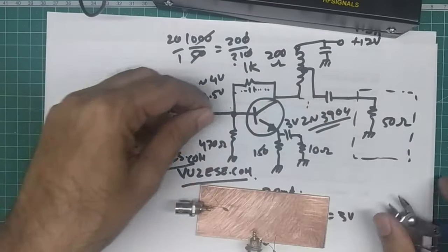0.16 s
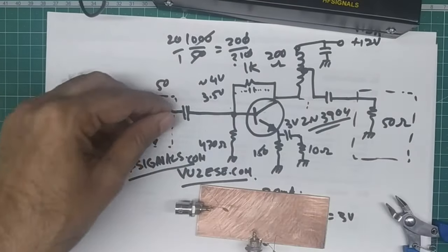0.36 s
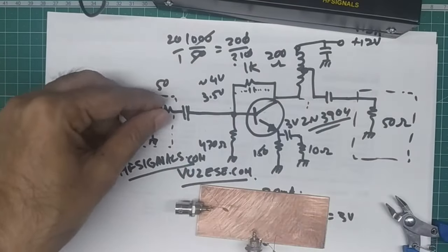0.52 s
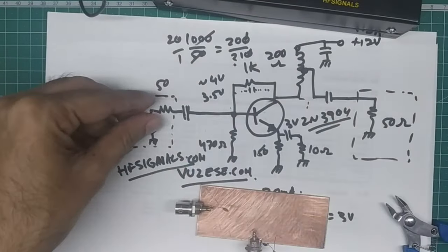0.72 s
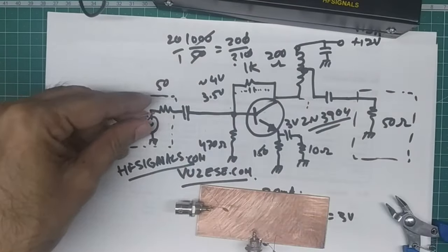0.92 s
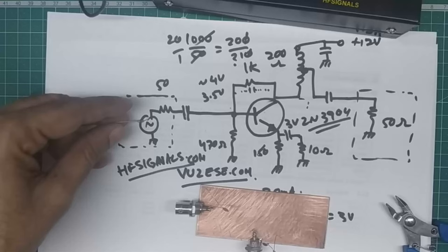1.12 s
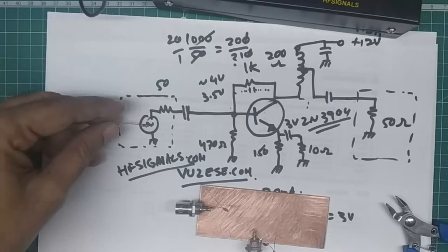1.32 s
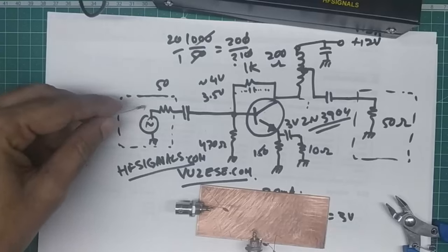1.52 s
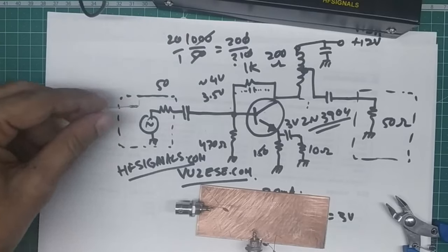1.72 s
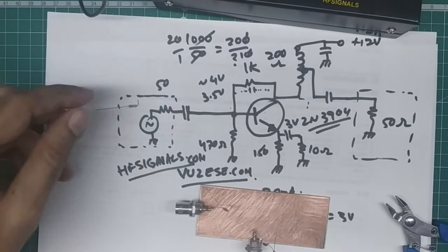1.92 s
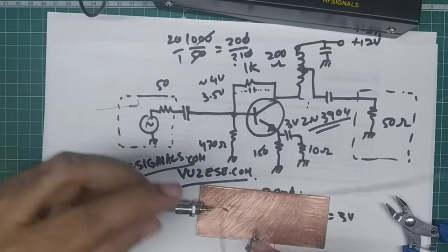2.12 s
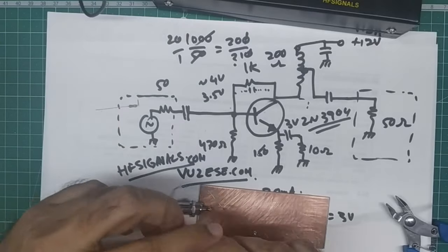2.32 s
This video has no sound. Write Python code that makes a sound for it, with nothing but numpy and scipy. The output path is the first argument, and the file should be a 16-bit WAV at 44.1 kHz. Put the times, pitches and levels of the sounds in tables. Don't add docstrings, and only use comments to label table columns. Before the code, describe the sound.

Small steel cutters land on a paper-covered wooden bench at 0.22 seconds and again, rattling, at 0.26-0.29, with hard handle knocks, a steel snap, a thud and short room echo. Faint thin leads tick, ring and scrape around 0.55-0.85, then more brightly at 1.05-1.27. Sparse dry taps and light paper scrapes follow from 1.4 to 2.3, the clearest near 1.8, over steady hiss and low rumble.

```python
import sys
import numpy as np
from scipy import signal
from scipy.fft import rfft, irfft, next_fast_len
from scipy.io import wavfile
from scipy.ndimage import uniform_filter1d, map_coordinates

SR = 44100
rng = np.random.default_rng(int(sys.argv[2]) if len(sys.argv) > 2 else 0)


def transcribe(u):
    v = np.clip(np.atleast_2d(u).T, -1, 1)
    q = np.round(v * 32767).astype(np.int16)
    wavfile.write(sys.argv[1], SR, q)


def natural_amplitude(level_db):
    exponent = np.asarray(level_db, float) / 20
    return 10 ** exponent


N = 103635
LEAD_LAG_S = 0.00011


def unit(x):
    return x / np.sqrt(np.mean(x ** 2) + 1e-20)


def along(points, hz):
    f, v = np.transpose(points)
    return np.interp(np.log(hz + 1), np.log(f + 1), v)


def wobble(rate):
    knots = rng.standard_normal(int(N * rate / SR) + 4)
    return map_coordinates(knots, [np.arange(N) * rate / SR])


def filtered(x, response):
    n = x.shape[-1]
    m = next_fast_len(n + 8192)
    return irfft(rfft(x, m) * response(np.fft.rfftfreq(m, 1 / SR)), m)[..., :n]


def noise(spectrum, alike, size=N):
    def mid_side(hz):
        turn = np.arccos(np.clip(along(alike, hz), -1, 1)) / 2
        return natural_amplitude(along(spectrum, hz)) * [np.cos(turn), np.sin(turn)]

    mid, side = filtered(rng.standard_normal((2, size)), mid_side)
    return unit(np.array([mid + side, mid - side]))


def ring(modes, t, scatter_db):
    draw = rng.standard_normal((len(modes), 2))
    total = 0
    for (hz, db, t60), (level, detune) in zip(modes, draw):
        decay = natural_amplitude(db + scatter_db * level - 60 * t / t60)
        total = total + decay * np.sin(2 * np.pi * hz * (1 + 0.002 * detune) * t)
    return total / 2


def add(track, s, sound):
    part = track[:, round(s * SR):][:, :sound.shape[-1]]
    part += sound[..., :part.shape[1]]


def sides(pan_db):
    return natural_amplitude(np.array([[0.5], [-0.5]]) * np.clip(pan_db, -9, 9))


def lagged(x, lag_s):
    return filtered(x, lambda hz: np.exp(-1j * np.pi * hz * lag_s * np.array([[1], [-1]])))


# start_s [s], knock_db [dB], snap_db [dB], thud_db [dB]
CUTTER_CONTACTS = [
    (0.2202, -57, -22, -43),
    (0.2219, -10.5, -44, -16),
    (.2250, -27, -47, -24.5),
    (0.262, -15, -24, -31.5),
    (0.2655, -33, -32.5, -38),
    (0.267, -7, -26, -26),
    (0.2701, -14, -30, -17.5),
    (0.2758, -18, -45, -23),
    (0.2853, -11.5, -25.5, -29.5),
    (.2935, -40, -60, -30.5),
]
# pitch_hz [Hz], level_db [dB], t60_s [s]
HANDLE_MODES = [(1385, -14, 0.0088), (1520, -7, 0.0077), (2270, 9, 0.0048), (2680, 9, 0.0042),
                (3430, 3, 0.0029), (4050, -5, 0.0069), (4780, -15.5, 0.0046)]
# pitch_hz [Hz], level_db [dB], t60_s [s]
BENCH_MODES = [(112.8, -20, .6), (175.5, -16.5, 0.24), (264.5, -6, 0.077), (294.5, -7, 0.079),
               (376, -14, .06), (566, -6, .034), (685, -6.5, 0.041), (857, -9.5, .025), (1073, -12.5, .03)]
# freq_hz [Hz], level_db [dB per Hz]
SNAP_COLOUR = [(1760, -47), (3000, 2), (4570, -14), (8380, 20), (15500, -11), (16500, -27)]
# freq_hz [Hz], level_db [dB per Hz]
THUMP_COLOUR = [(50, -22), (270, -10), (520, -13.5), (900, -12.5), (2200, -21.5), (3500, -27.5),
                (7000, -37.5), (14000, -42.5)]


def cutters():
    near, bench, t = np.zeros((2, N)), np.zeros((2, N)), np.arange(SR // 2) / SR
    snap_t60_s, thump_t60_s, thump_db = 0.007, 0.043, -4
    pan_db, lag_s = 3.5, -0.00012
    for s, knock_db, snap_db, thud_db in CUTTER_CONTACTS:
        snap = noise(SNAP_COLOUR, [(5000, 0.22)], size=len(t))
        snap = snap * natural_amplitude(snap_db - 60 * t / snap_t60_s) * (1 - np.exp(-t / 0.0003))
        knock = natural_amplitude(knock_db) * ring(HANDLE_MODES, t, 1) * (1 - np.exp(-t / 0.00041))
        add(near, s, knock + snap)
        thump = noise(THUMP_COLOUR, [(200, 1.0), (600, 0.58), (2000, 0.063)], size=len(t))
        thump = thump * natural_amplitude(thump_db - 60 * t / thump_t60_s)
        add(bench, s, natural_amplitude(thud_db) * (thump - ring(BENCH_MODES, t, 1)) * (1 - np.exp(-t / 0.00077)))
    return lagged(near * sides(pan_db), lag_s), lagged(bench * sides(0.5), lag_s)


# start_s [s], peak_db [dB], crack_t60_s [s], ring_db [dB], left_right_db [dB]
LEAD_TICKS = [(.0452, -40, 0.034, -5, -1), (.558, -45.5, .049, -11.5, 7), (.576, -47, 0.017, -34, 2),
              (0.6704, -36.5, 0.079, -15.5, 5), (0.711, -45.5, .04, -7, 7.5),
              (.7225, -38, 0.046, -10.5, 15.5), (.7331, -31, .035, -4.5, 7),
              (0.7598, -44.5, 0.016, -3, 7.5), (.7750, -45.5, 0.033, -7.5, 7), (0.806, -44.5, .02, -7, 4.5),
              (.8320, -53.5, .02, -7, 6), (1.0668, -46.5, 0.033, -10, 11), (1.078, -42, 0.049, -8, 10),
              (1.0855, -41, .04, -17.5, 0.5), (1.0928, -34, 0.077, -9, 6.5),
              (1.1380, -36, 0.055, -12, -2.5), (1.15, -29, .035, -11, 7), (1.159, -35, 0.044, -30, 8),
              (1.2084, -23, .022, -9, 5.5), (1.2200, -33, 0.038, -13, 2.5), (1.2464, -36, .048, -5.5, 13.5),
              (1.268, -39.5, 0.023, -13.5, 3)]
# pitch_hz [Hz], level_db [dB], t60_s [s]
FIRST_BUNDLE = [(3560, -12, 0.2), (4130, -12.5, 0.056), (5055, -3, 0.13), (5570, -3.5, 0.14),
                (6770, -4.5, 0.15), (8000, -8, 0.15), (8586, -6.5, 0.13), (9507, -20.5, .13),
                (10300, 7.5, 0.053), (11700, -16, 0.15), (14000, -4.5, .14), (14950, -12, .2),
                (12900, -8, 0.12)]
# pitch_hz [Hz], level_db [dB], t60_s [s]
SECOND_BUNDLE = [(2116, -9, 0.083), (3710, -7, 0.28), (5160, -12, 0.2), (5604, -22, .2), (6400, -16, 0.23),
                 (6799, -21, 0.35), (6720, -21, 0.16), (7600, -13, 0.16), (8290, -10, 0.21),
                 (9630, 0.5, 0.14), (10430, -3, 0.065), (11800, -19, 0.15), (13630, -14, .1),
                 (15310, -12, .15)]
# freq_hz [Hz], level_db [dB per Hz]
CRACK_COLOUR = [(600, -56), (1500, -32), (3500, -8.5), (6000, -6), (9000, 1), (14500, -5.5), (16800, -6.5)]


def leads():
    out, t = np.zeros((2, N)), np.arange(SR // 4) / SR
    swap_s = 1.0
    jingle_db, jingle_t60_s = -14, 0.14
    for s, db, t60, ring_db, pan_db in LEAD_TICKS:
        shape = 0.4 * natural_amplitude(-60 * t / max(t60, 0.002)) + 1.5 * natural_amplitude(-60 * t / 0.0025)
        crack = noise(CRACK_COLOUR, [(5000, 0.12)], size=len(t)) * shape
        bundle = FIRST_BUNDLE if s < swap_s else SECOND_BUNDLE
        jingle = [(hz, jingle_db, jingle_t60_s) for hz in rng.uniform(3000, 15500, size=24)]
        metal = ring(bundle + jingle, t, 2) * (1 - np.exp(-t / 0.0006))
        rough = 0.6 * rng.standard_normal((2, len(t))) * shape / np.linalg.norm(shape)
        push = rough + (t == 0)
        rung = signal.fftconvolve(push, metal[None], axes=1)[:, :len(t)]
        add(out, s, natural_amplitude(db - 4.5) * sides(pan_db) * (crack + natural_amplitude(ring_db) * rung))
    return lagged(out, LEAD_LAG_S)


def patchy(pair):
    z = signal.stft(pair, nperseg=128)[2]
    field = uniform_filter1d(rng.standard_normal(z.shape[1:]), size=2, axis=0)
    field = uniform_filter1d(field, size=14, axis=1)
    swell_db = 3 * unit(field)
    return signal.istft(z * natural_amplitude(swell_db), nperseg=128)[1][:, :N]


# start_s [s], length_s [s], level_db [dB], body_db [dB], left_right_db [dB]
STROKES = [(0.043, 0.035, -50.5, -11.5, 2), (0.064, 0.061, -55, 3.5, 5.5), (0.095, 0.021, -55, -2, -3),
           (0.259, 0.0089, -38.5, 4.5, 5), (0.34, 0.06, -58, -25, 16), (0.544, 0.22, -67.5, 0, 3),
           (0.693, 0.0305, -64.5, 4.5, -8), (0.747, 0.11, -71.5, 3, 1.5), (1.061, 0.05, -56, 4.5, 1.5),
           (1.114, 0.068, -63.5, 10, -1), (1.196, 0.082, -63, 4.5, 4), (1.293, 0.074, -61.5, -4, 0),
           (1.406, 0.066, -63.5, -29, -1.5), (1.493, 0.037, -55, -11.5, -4), (1.537, 0.15, -63.5, -8.5, -1),
           (1.68, 0.018, -69, 10, 14), (1.768, 0.025, -61.5, -7.5, 2), (1.802, 0.017, -71, -15.5, -7),
           (2.032, 0.089, -66, 3, 1)]
# freq_hz [Hz], level_db [dB per Hz]
FIZZ_COLOUR = [(2650, -48), (4500, -26.5), (8410, 9), (11000, 1), (15400, -12), (16200, -15), (16500, -47)]
# freq_hz [Hz], level_db [dB per Hz]
BODY_COLOUR = [(180, -28), (300, -13), (1500, -14.5), (1820, -11.5), (2180, -7), (2410, -7.5),
               (6500, -11.5), (8450, -55), (14300, -120)]


def scrapes():
    out, t = np.zeros((2, N)), np.arange(N) / SR
    grain = natural_amplitude(1.6 * wobble(400) + 1.2 * wobble(70))
    fizz = unit(grain * patchy(noise(FIZZ_COLOUR, [(5000, 0.13)])))
    body = unit(grain * patchy(noise(BODY_COLOUR, [(2000, 0.12)])))
    for s, length, db, body_db, pan_db in STROKES:
        rise = np.clip((t - s) / min(0.5 * length, 0.02), 0, 1)
        fall = natural_amplitude(-60 * np.clip(t - s - length, 0, None) / 0.011)
        out = out + natural_amplitude(db) * sides(pan_db) * rise * fall * (fizz + natural_amplitude(body_db) * body)
    return lagged(out, LEAD_LAG_S)


# start_s [s], peak_db [dB], t60_s [s], left_right_db [dB]
DRY_TAPS = [(1.436, -43, 0.023, -1.5), (1.504, -42.5, 0.042, -4), (1.6660, -49.5, 0.026, 3.5),
            (1.6852, -35.5, 0.032, 0), (1.6930, -49, 0.043, 0), (1.725, -41.5, .03, 3),
            (1.7878, -47.5, .01, 2), (1.8087, -28.5, 0.031, -6.5), (2.051, -42, 0.025, 11),
            (2.074, -50.5, 0.027, 5), (2.110, -49, 0.022, 8), (2.3037, -44.5, 0.033, -1.5)]
# freq_hz [Hz], level_db [dB per Hz]
TAP_COLOUR = [(600, -19), (1000, -24.5), (2400, -12.5), (4500, -18.5), (8200, 0), (10500, -8.5),
              (14000, -19), (16800, -6.5)]


def taps():
    out, t = np.zeros((2, N)), np.arange(SR // 10) / SR
    for s, db, t60, pan_db in DRY_TAPS:
        shape = 0.4 * natural_amplitude(-60 * t / max(t60, 0.002)) + natural_amplitude(-60 * t / 0.004)
        puff = noise(TAP_COLOUR, [(5000, 0.18)], size=len(t))
        add(out, s, natural_amplitude(db - 5) * sides(pan_db) * shape * puff)
    return lagged(out, LEAD_LAG_S)


# start_s [s], pitch_hz [Hz], level_db [dB], t60_s [s]
BENCH_KNOCKS = [
    (1.612, 1200, -53, .06),
    (1.165, 1200, -58, .06),
    (1.212, 280, -56, .08),
    (1.215, 680, -58, .08),
    (1.267, 2200, -53, .05),
    (.375, 60, -42, .1),
]


def knocks():
    out, t = np.zeros((2, N)), np.arange(SR // 4) / SR
    for s, hz, db, t60 in BENCH_KNOCKS:
        pair = ring([(hz, db, t60), (hz * 1.07, db - 4, t60)], t, 0)
        add(out, s, pair[None] * 2 * (1 - np.exp(-t / 0.004)))
    return out


# freq_hz [Hz], likeness [0 to 1]
DIFFUSE_ALIKE = [(50, 0.83), (200, 0.9), (500, 0.4), (1500, 0.067), (8000, 0.047)]
# freq_hz [Hz], t60_s [s]
ROOM_T60 = [(100, 0.98), (300, 0.62), (2000, 0.74), (5000, 0.55), (12000, 0.16)]
# freq_hz [Hz], level_db [dB]
ROOM_TONE = [(100, 1), (280, -4), (600, -5.5), (3000, -4), (10000, -0.5)]


def room(x, wet_db):
    hz, t, z = signal.stft(noise([(100, 0)], DIFFUSE_ALIKE, size=SR), SR, nperseg=256)
    decay_db = along(ROOM_TONE, hz)[:, None] - 60 * t / along(ROOM_T60, hz)[:, None]
    tail = signal.istft(z * natural_amplitude(decay_db), SR, nperseg=256)[1]
    tail = tail * np.clip(np.arange(tail.shape[1]) / (0.025 * SR), 0, 1)
    tail = tail / np.linalg.norm(tail[0])
    return natural_amplitude(wet_db) * signal.fftconvolve(x.mean(0)[None], tail, axes=1)[:, :N]


# freq_hz [Hz], level_db [dB per Hz]
HISS_COLOUR = [(130, -27), (220, -2.5), (407, -7.5), (627, -10), (2100, -16.5), (2430, -15), (14300, -15.5),
               (15700, -17), (16000, -45)]
# freq_hz [Hz], level_db [dB per Hz]
RUMBLE_COLOUR = [(11, -62), (18, -1.5), (53, 1.5), (75, -15.5), (103, -6.5), (124, -22), (178, -7.5),
                 (222, -25.5), (260, -42), (340, -31), (570, -120)]


def background():
    hiss_db, rumble_db = -65, -57.5
    hiss = natural_amplitude(hiss_db + 0.16 * wobble(4.42)) * noise(HISS_COLOUR, DIFFUSE_ALIKE)
    rumble = unit(natural_amplitude(0.64 * wobble(4.82)) * noise(RUMBLE_COLOUR, DIFFUSE_ALIKE))
    return hiss * sides(0.17) + natural_amplitude(rumble_db) * rumble * sides(1.3)


def scene():
    near, bench = cutters()
    small = leads() + taps() + scrapes()
    big_room = room(natural_amplitude(-9) * near + bench, wet_db=-8.5)
    small_room = room(small, wet_db=-11.5)
    return near + bench + big_room + small + small_room + knocks() + background()


def band_limit(x):
    return signal.sosfilt(signal.butter(12, 16900, fs=SR, output="sos"), x)


def record(dry):
    top_hz, above_db = 15850, -16
    mix = filtered(dry, lambda hz: np.where(hz < top_hz, 1, natural_amplitude(above_db)))
    return band_limit(mix)


dry = scene()
out = record(dry)
transcribe(out)
```